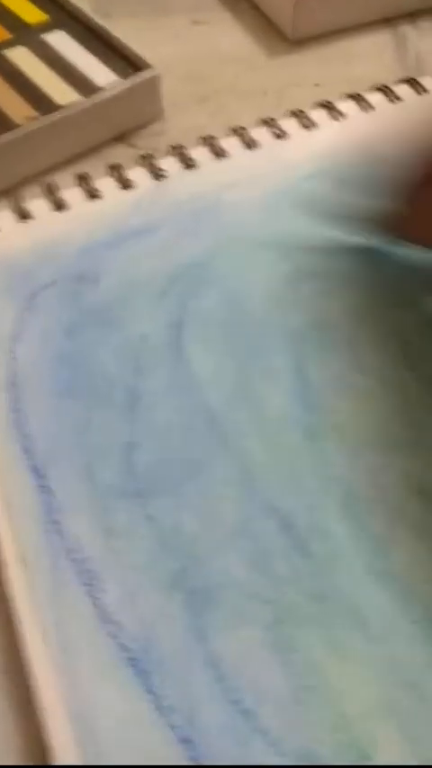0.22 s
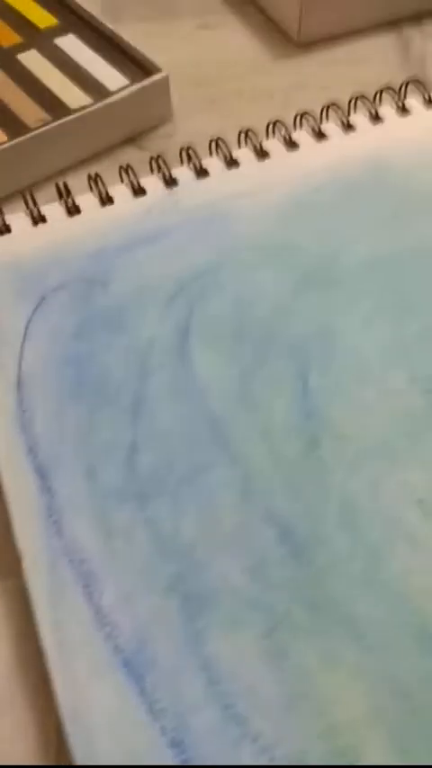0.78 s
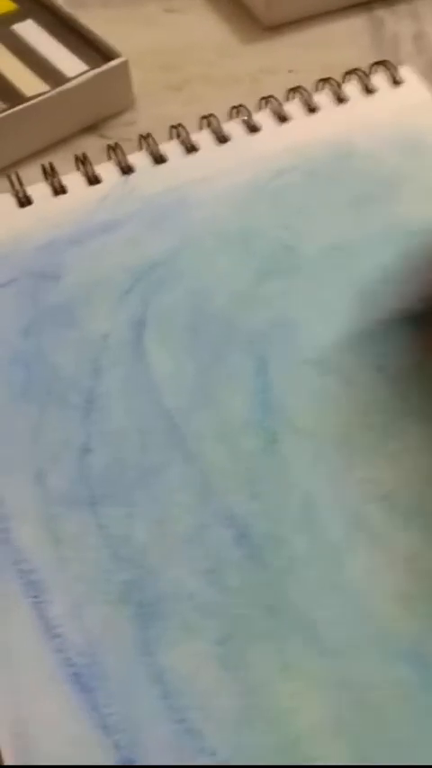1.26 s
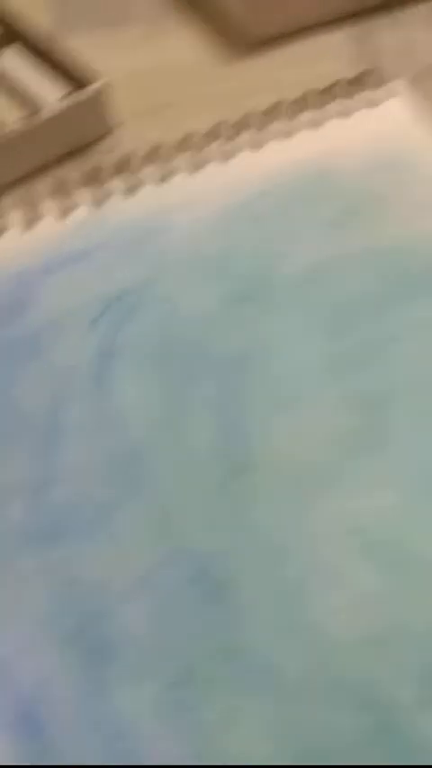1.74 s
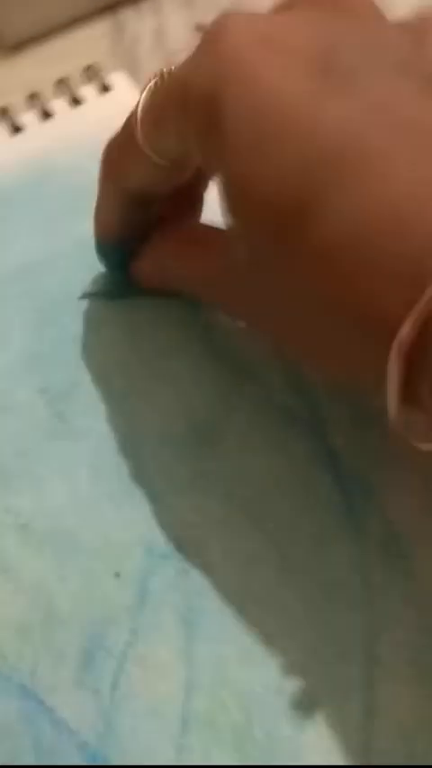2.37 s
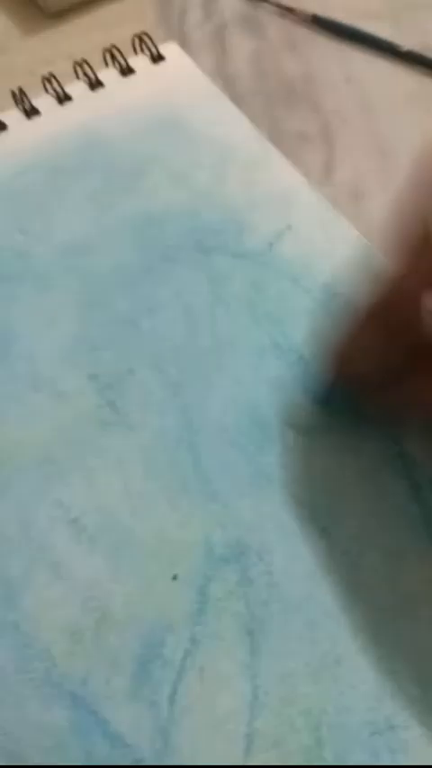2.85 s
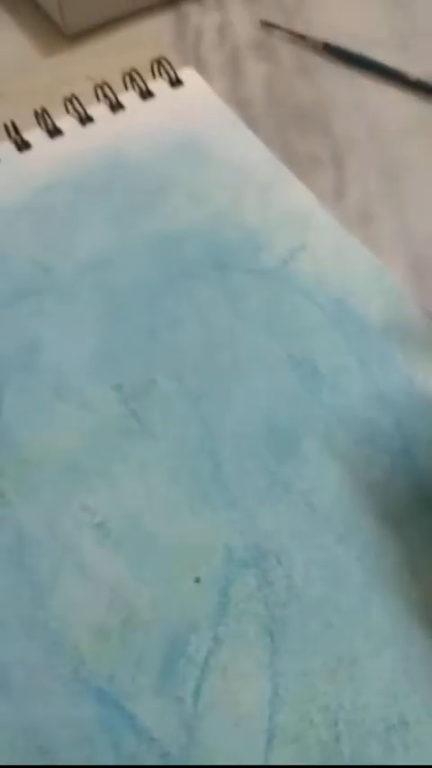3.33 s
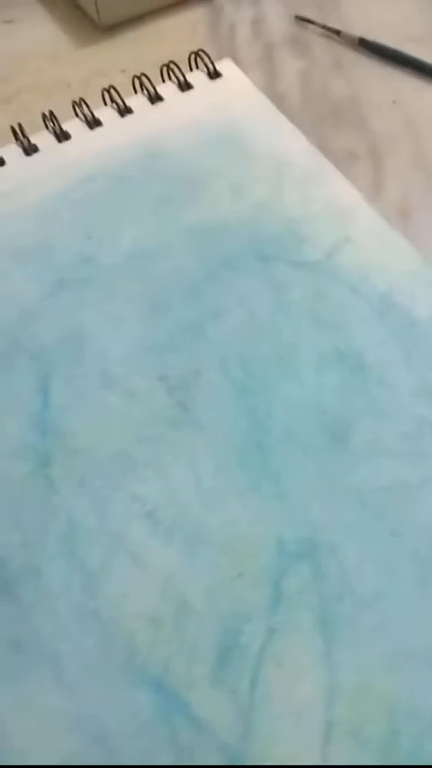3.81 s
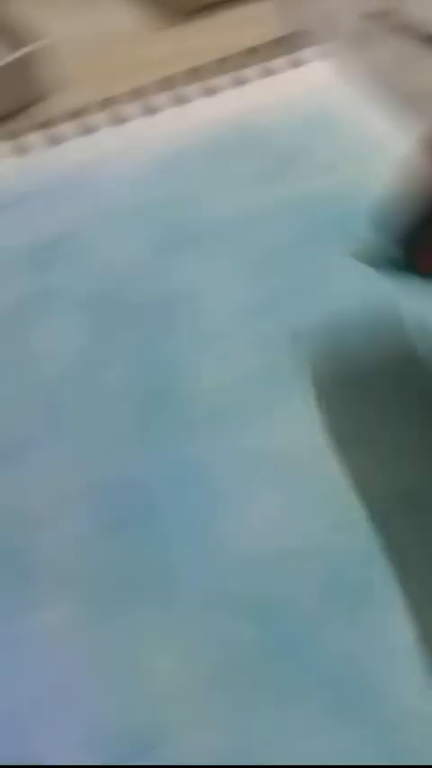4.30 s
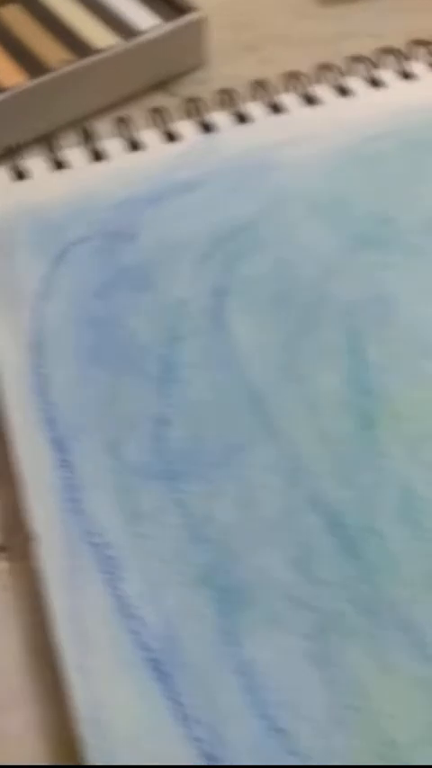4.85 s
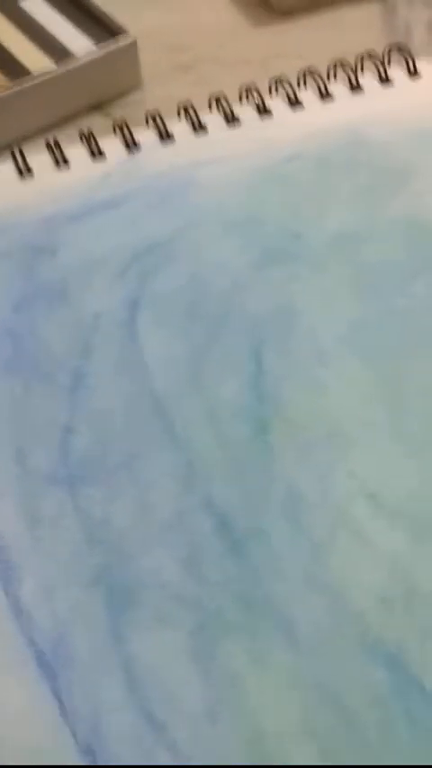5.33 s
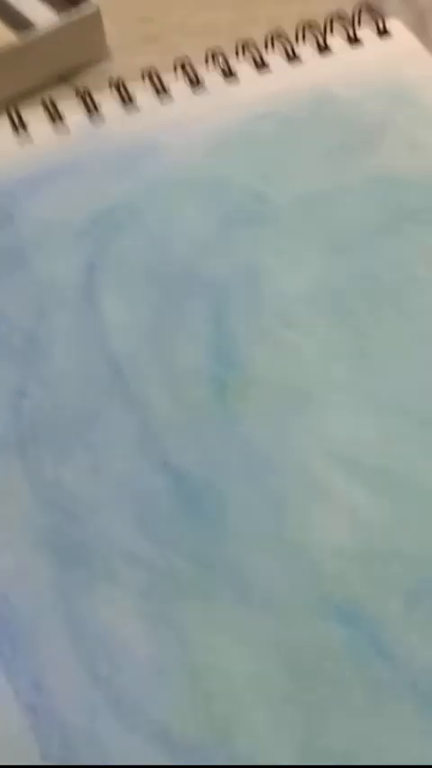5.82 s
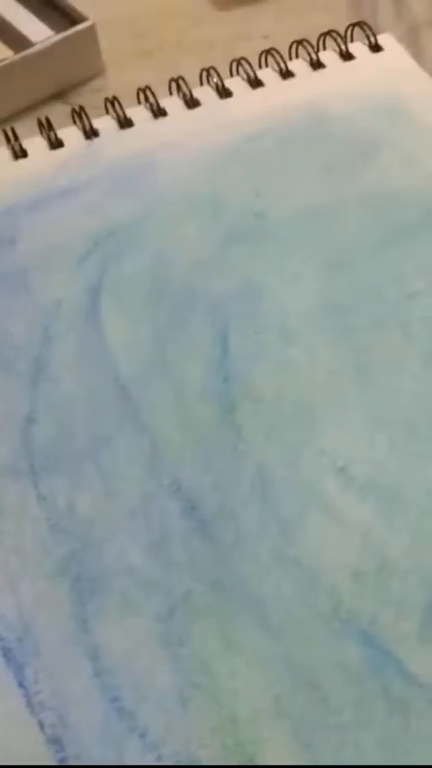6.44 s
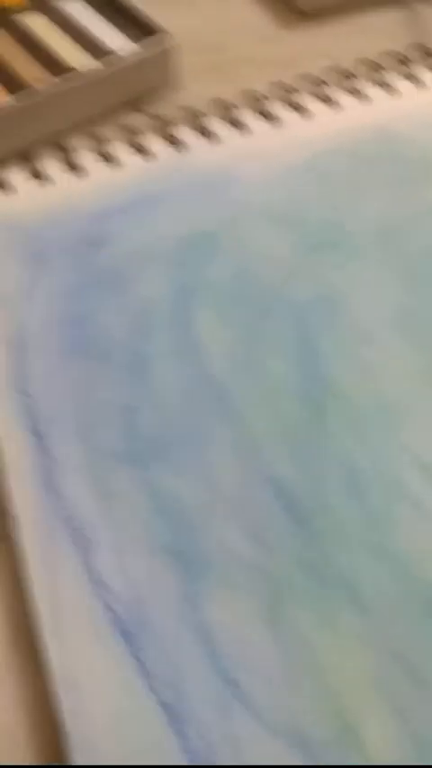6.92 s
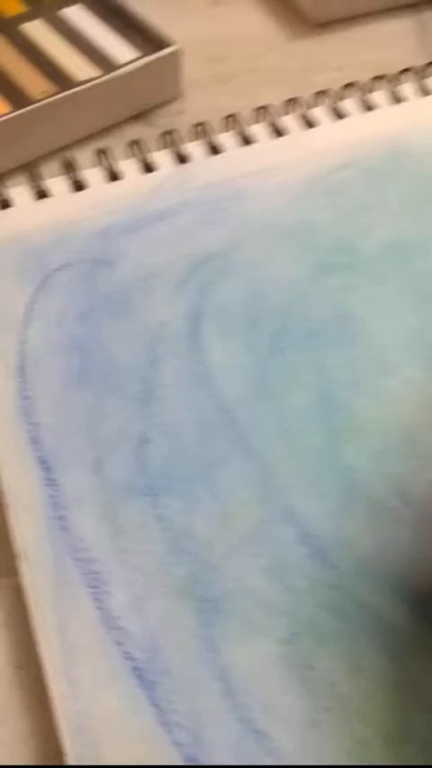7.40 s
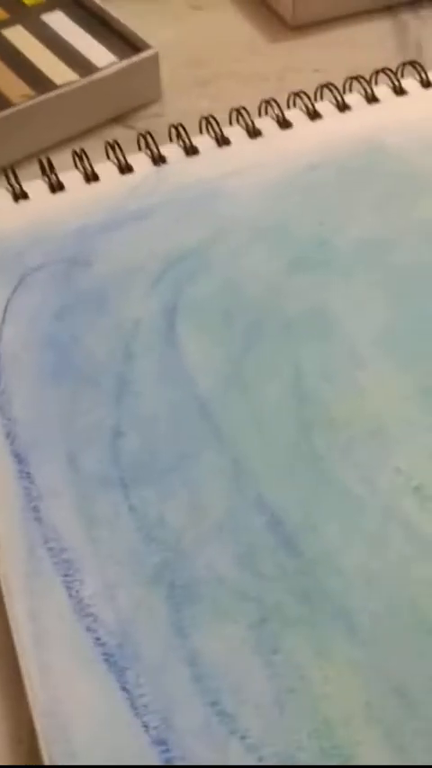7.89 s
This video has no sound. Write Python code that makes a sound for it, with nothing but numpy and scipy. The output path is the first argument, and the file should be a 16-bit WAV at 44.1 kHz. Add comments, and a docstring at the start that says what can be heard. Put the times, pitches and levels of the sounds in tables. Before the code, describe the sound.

A close stereo microphone catches chalky strokes on textured sketchbook paper: bright airy hiss over a drier papery rasp, rapid and uneven, stopping and restarting about every second. After an early pause the rubbing resumes, with small clicks and muted thumps in the gaps. The indoor background is very quiet: dull rush, low hum and a muffled far drone rising in the second half.

```python
"""A stick of dry pastel is rubbed to and fro on a sketchbook page, in short bursts of strokes, in a small room.
The chalk catches on the tooth of the paper in thousands of tiny slips, made of random clicks:
filtered one way they are a bright hiss, filtered another way the duller rasp of the sheet.
Soft bumps (damped ringing), crumb ticks (tiny noise bursts) and a faint squeak (a sinking tone) join in.
Behind are air hiss and a dull rush (noise), a low machine hum and a far, swelling drone (noise and tones)."""
import sys
import numpy as np
from scipy import signal
from scipy.fft import rfft, irfft, next_fast_len
from scipy.io import wavfile

SR = 44100
rng = np.random.default_rng(int(sys.argv[2]) if len(sys.argv) > 2 else 0)


def materialize(psi):
    """Save the field psi as 16-bit PCM at rate SR to the path in sys.argv[1].

    A 1-D psi becomes a single channel; in a 2-D psi each row is a channel.
    """
    bounded = np.clip(np.atleast_2d(psi).T, -1, 1)
    quanta = np.round(bounded * 32767).astype(np.int16)
    wavfile.write(sys.argv[1], SR, quanta)


N = 359415

# single strokes, to or fro: (start [s], length [s], chalk hiss before trim [dB], sheet rasp before trim [dB],
# hiss left minus right [dB], spread of the flexing sheet before its shares [dB], ring of the pad [dB])
STROKES = [(-0.036, 0.053, -27.5, -38, 7, 3, -3), (0.024, 0.1, -29.5, -42, 3.5, 8, -1),
           (0.351, 0.14, -30, -37, 2.5, 3, 2), (0.451, 0.09, -30.5, -36.5, 4, 5, -7),
           (0.536, 0.098, -25.5, -36.5, 2.5, 2, 2.5), (0.638, 0.099, -29.0, -37.5, 4.5, 7, -5),
           (0.729, 0.086, -25.5, -38, 3, 23, 3.5), (0.789, 0.093, -33.0, -41, 4.5, -6, 2),
           (1.113, 0.15, -27.5, -38.5, 3.5, 6, 3), (1.261, 0.087, -28.0, -38, 4.5, 6, -2),
           (1.344, 0.11, -24.5, -37, 2, 5, 2.5), (1.451, 0.14, -27, -39, 4.5, 0, 5),
           (1.567, 0.097, -25, -36, 7.5, -3, 0.5), (2.392, 0.08, -49.5, -60, 6, -3, 6),
           (2.497, 0.12, -35.5, -39.5, 0, 14, 2.5), (2.581, 0.21, -29.5, -37.5, 1.5, 17, -1.5),
           (2.776, 0.086, -25.5, -33, 3.5, 14.5, 2), (2.848, 0.11, -30.5, -42.0, 7, 11, -1),
           (2.921, 0.11, -26, -37.5, 8.0, -11, 1), (3.007, 0.11, -32, -43, 7.5, -3, 2),
           (3.099, 0.094, -28, -41, 9.5, -18, 2), (3.225, 0.019, -44, -51.5, 6.5, -11, 13),
           (3.53, 0.075, -26.0, -39.5, 7, 20, 2), (3.597, 0.15, -26, -47.5, 4, 10, 2),
           (3.689, 0.11, -24.5, -39, 9.5, -0.5, -4), (3.78, 0.13, -26.5, -46, 8, -6, -3),
           (3.88, 0.079, -24, -36, 9.5, -1, -6.5), (4.451, 0.11, -39.5, -44, 3, 5, -0.5),
           (4.516, 0.16, -26, -38.5, 1.5, 13, -0.5), (4.642, 0.092, -30, -43.5, 4.0, 5, 3.5),
           (4.708, 0.18, -27.5, -38.5, 6, -2, 2.5), (4.834, 0.19, -28.5, -40.5, 7.5, -3.5, 2.5),
           (5.269, 0.16, -27, -42, 8, -4, 6.5), (5.376, 0.11, -25.5, -38, 10, 4, -2.5),
           (5.476, 0.12, -28, -39, 5, -1.0, -3.5), (5.557, 0.096, -39.5, -49, 3, -9, 1.0),
           (5.852, 0.13, -25.0, -37, 8.5, 3, 3.5), (5.964, 0.08, -26.5, -39, 6, 0, -2.5),
           (6.054, 0.097, -27.5, -38, 5.5, -4.5, -0.0), (6.138, 0.099, -31, -41.5, 4, -10, 0),
           (6.456, 0.05, -47, -56.5, 11.5, -6, 8), (6.483, 0.19, -26, -39, 7.0, -3, -11),
           (6.655, 0.12, -32.5, -42, 7, -3, -2.5), (7.165, 0.054, -42, -49, 4, 4, 9),
           (7.209, 0.23, -27.5, -41.5, 3.5, 2.5, -2.0), (7.399, 0.22, -28.0, -41.0, 9, -4, 3.5),
           (7.572, 0.13, -30.5, -43.5, 5.5, -6, 2), (7.659, 0.13, -26.5, -40, 9.5, -3, 1),
           (7.736, 0.15, -31, -39.5, 7, -9.5, -7), (8.109, 0.14, -28.5, -41.5, 12, 0, 4)]
# bursts of strokes; the first is already under way at 0 s, the others begin as the stick lands:
# (time [s], bite [dB], brightness of the very top [dB], dull scuff [dB])
BURSTS = [(0.0, -40, -2, 2.5), (0.364, -62, 0.5, -6), (1.131, -41, -1, -5), (2.495, -54, 0, -7.5),
          (3.544, -27, -2.5, 0), (4.47, -61, -2, -3), (5.293, -44, -2, -1), (5.869, -54, -1, -1.5),
          (6.502, -33, -1, 1), (7.173, -58, -1, -2.5), (8.119, -59, -4.5, 3)]
# how alike left and right are in the background: (frequency [Hz], likeness [-1 to 1])
AIR_LIKENESS = [(100, 0.96), (280, 0.92), (600, 0.027), (1500, 0.051), (6500, 0.13), (7300, 1),
                (15000, 0.93)]


def pastel():
    """A faster stroke is louder and crosses more grains; hand pressure flutters both parts together."""
    # colour of the chalk hiss: (frequency [Hz], relative density [dB])
    hiss_colour = [(2650, -43.5), (4500, -17.5), (6000, -9.5), (8550, -3), (9870, -1.1), (12000, -5),
                   (13600, -9.5), (15600, -13)]
    # colour of the sheet's rasp: (frequency [Hz], relative density [dB])
    rasp_colour = [(60, -64), (300, -19), (600, -22), (850, -10), (1120, -5), (1400, -10.5), (1750, -8),
                   (2200, -5.5), (2700, -2), (3300, 0), (4000, 1), (5000, -1.5), (6000, 2), (8000, -15.5)]
    # how alike the friction is on the two sides: (frequency [Hz], likeness [-1 to 1])
    likeness = [(500, .3), (1050, .4), (1500, -.1), (2000, -.05), (2550, -.65), (3300, 0), (4300, -.15),
                (4800, .3), (5600, -.1), (6600, -.05), (7100, .78), (8500, .94), (12000, .9), (15500, .72)]
    # which side the friction leans to: (frequency [Hz], left minus right [dB])
    lean = [(700, -3.5), (1500, 1), (2500, -1), (3400, -5), (4200, -3), (5800, -1.5), (9000, -3.5),
            (12000, -4), (13500, -6.5), (15500, -12)]

    hiss_gain, rasp_gain = stroke_gains()
    hiss_gain = hiss_gain + bite(fade_s=0.0057)
    edge_db, scuff_db = tipping()
    pan_db, spread_db, pad_db = per_stroke()
    slips_per_s = 8000 + 22000 * np.sqrt(hiss_gain / hiss_gain.max())
    hiss_slips = slips(slips_per_s, size_db=1.0, clump_db=-1.43, clump_hz=500)
    rasp_slips = slips(slips_per_s, size_db=0.0, clump_db=0.5, clump_hz=320)
    hiss = stereo(hiss_slips, hiss_colour, likeness)
    rasp = stereo(rasp_slips, rasp_colour, likeness)
    # the edge of the stick sets how bright the very top is, mostly softening it
    hiss = hiss + shaped(hiss, high_share(8800)) * (from_db(edge_db) - 1)
    # how flat the stick lies sets how much dull scuff is heard below the hiss
    rasp = rasp + shaped(rasp, 1 - high_share(3260)) * (from_db(scuff_db) - 1)
    hiss = from_db(-0.97) * hiss_gain * hiss * from_db(np.array([pan_db, -pan_db]) / 2)
    rasp = from_db(-3.0) * rasp_gain * sheet(rasp, spread_db, pad_db)
    pressure = from_db(0.32 * drift(30))
    rub = pressure * patchy(hiss + rasp, patch_db=1.85, patch_hz=13.0, sway_db=1.0)
    # reflections off the fingers and the palm
    fingers = glance(rub, lag_ms=.55, wander=.18, strength=.4)
    palm = glance(rub, lag_ms=1.4, wander=.13, strength=.38)
    return shaped(rub + fingers + palm, from_db(at_hz(lean) * [[1], [-1]] / 2))


def stroke_gains():
    """Hiss and rasp follow the speed of the hand through each stroke, and linger briefly."""
    arch_power = 0.63  # below 1 gives a flatter arch
    linger_s = .0125
    power = np.zeros((2, N))
    for start_s, length_s, hiss_db, rasp_db, *_ in STROKES:
        at, speed = arch(start_s, length_s)
        power[:, at] += np.outer(from_db([hiss_db, rasp_db]), speed ** arch_power) ** 2
    keep = np.exp(-1 / (linger_s * SR))
    return np.sqrt(signal.lfilter([1 - keep], [1, -keep], power + 1e-18))


def arch(start_s, length_s):
    """Half a sine, from rest to full speed and back: the samples it covers, and the speed at each."""
    first = max(int(start_s * SR), 0)
    end = min(int((start_s + length_s) * SR), N)
    at = np.arange(first, end)
    return at, np.maximum(np.sin(np.pi * (at / SR - start_s) / length_s), 0)


def bite(fade_s):
    """The stick bites into the paper at each time in the table: abrupt friction that fades at once."""
    kicks = np.zeros(N)
    for time_s, db, *_ in BURSTS:
        kicks[max(int(time_s * SR), 0)] = from_db(db)
    return signal.lfilter([1], [1, -np.exp(-1 / (fade_s * SR))], kicks + 1e-18)


def tipping():
    """Edge and scuff in dB: within each burst the top softens and the scuff grows as the stick tips flat."""
    edge_db_per_s, scuff_db_per_s, longest_tip_s = -4.5, 3, 1
    burst_s, _, edge_db, scuff_db = np.transpose(BURSTS)
    t = np.arange(N) / SR
    burst = np.maximum(np.searchsorted(burst_s, t) - 1, 0)
    age = np.minimum(t - burst_s[burst], longest_tip_s)
    return edge_db[burst] + edge_db_per_s * age, scuff_db[burst] + scuff_db_per_s * age


def per_stroke():
    """Pan, spread and pad level, gliding from the middle of one stroke to the next."""
    return in_time([(start_s + length_s / 2, *rest) for start_s, length_s, _, _, *rest in STROKES])


def slips(per_s, size_db, clump_db, clump_hz):
    """Two trains of tiny, uneven slips, clumped by the ridges of the paper, plus coarse grains that snag."""
    snags_per_s, largest_snag_db = 170, 15
    chance = np.clip(per_s / SR, 1e-3, 1)
    born = rng.random((2, N)) < chance
    extra_db = size_db * np.minimum(rng.exponential(1, (2, N)), 3)
    sizes = from_db(extra_db) * rng.standard_normal((2, N))
    snagged = rng.random((2, N)) < snags_per_s / SR
    snag_sizes = from_db(largest_snag_db) * rng.uniform(0.26, 1, (2, N))
    snags = snagged * snag_sizes * rng.choice([-1, 1], (2, N))
    clumps = from_db(clump_db * np.clip(drift(clump_hz), -2, 2))
    # dividing by the root of the chance keeps the power even when slips are rare
    return born * sizes / np.sqrt(chance) * clumps + snags


def sheet(rasp, spread_db, pad_db):
    """The touched spot sets how the sheet rocks, in opposite phase at the sides; the pad rings below."""
    flex_low_hz, flex_high_hz = 1490, 3520
    hollow_share, widen_share = 0.46, 0.28  # a positive spread thins the centre and lifts the sides
    mid, side = (rasp[0] + rasp[1]) / 2, (rasp[0] - rasp[1]) / 2
    flex = high_share(flex_low_hz) * (1 - high_share(flex_high_hz))
    mid = mid + shaped(mid, flex) * (from_db(-hollow_share * spread_db) - 1)
    side = side + shaped(side, flex) * (from_db(widen_share * spread_db) - 1)
    rasp = np.array([mid + side, mid - side])
    return rasp + shaped(rasp, 1 - high_share(flex_low_hz)) * (from_db(pad_db) - 1)


def patchy(x, patch_db, patch_hz, sway_db):
    """Each part of the spectrum swells and sinks a little on its own, and sways between left and right."""
    centres = np.geomspace(900, 15000, num=11)  # Hz
    spectrum, hz, out = rfft(x, fft_size()), bin_hz(), 0
    for k in range(len(centres)):
        share = np.interp(hz, centres, np.arange(len(centres)) == k)
        level_db = patch_db * drift(patch_hz) + np.outer([1, -1], sway_db * drift(patch_hz / 2))
        out = out + irfft(spectrum * share, fft_size())[:, :N] * from_db(level_db)
    return out


def glance(x, lag_ms, wander, strength):
    """A reflection off a nearby surface; its path changes as the hand moves, and sweeps a shallow comb."""
    n = np.arange(N)
    lag = SR * lag_ms / 1000 * (1 + wander * drift(2))  # samples
    return strength * np.array([np.interp(n - lag, n, side) for side in x])


def bumps():
    """Each soft handling bump rings the book's damped modes, unevenly in each ear; hard ones ring higher."""
    # soft bumps on the book: (time [s], level [dB], hardness [dB per octave])
    bump_rows = [(.909, -52, -2), (.921, -53, -2), (.933, -52, -2), (1.513, -48.5, 0), (1.855, -51, 3.5),
                 (4.262, -59, 0)]
    # what the book rings with: (frequency [Hz], relative level [dB], time to fall 60 dB [s])
    modes = [(183, -5, 0.12), (383, 5.5, 0.014), (750, 2, 0.0064), (1070, -2, 0.013), (1750, -12.5, 0.017),
             (2380, -11, .01)]
    spread_db = 3
    t, out = np.arange(SR // 8) / SR, np.zeros((2, N))
    rings = []
    for k, (hz, db, t60) in enumerate(modes):
        # neighbouring modes start in opposite directions
        rings.append((-1) ** k * from_db(db - 60 * t / t60) * np.sin(2 * np.pi * hz * t))
    octaves = np.log2(np.array(modes)[:, 0] / 500)
    for time_s, db, tilt_db in bump_rows:
        at = int(time_s * SR)
        strength_db = db + tilt_db * octaves + rng.normal(0, spread_db, (2, len(modes)))
        out[:, at:at + len(t)] += from_db(strength_db) @ np.array(rings)
    # the bumps carry no deep bass
    return signal.sosfilt(signal.butter(2, 150, "high", fs=SR, output="sos"), out)


def crumbs():
    """Crumbs of pastel tick on the page: each a tiny crack, coloured by a pitch of its own."""
    # ticks: (time [s], peak level [dB], pitch [Hz])
    ticks = [(1.069, -49.5, 8140), (2.014, -47, 10050), (2.307, -47, 10840), (3.426, -44, 10400),
             (3.488, -48, 7840), (4.214, -48, 10000), (4.237, -50.5, 10700), (4.254, -52, 9780),
             (5.055, -27.5, 10000), (5.129, -46, 10400), (5.214, -53, 14200), (6.325, -43, 15000),
             (6.959, -47, 11400), (8.01, -45, 10700), (8.053, -52, 9600)]
    t60_s, q = .014, 2.5  # the crack's fall of 60 dB, and how narrowly it is tuned
    t, out = np.arange(SR // 50) / SR, np.zeros((2, N))
    for time_s, db, hz in ticks:
        crack = rng.standard_normal((2, len(t))) * from_db(-60 * t / t60_s)
        tick = signal.lfilter(*signal.iirpeak(hz, q, fs=SR), crack)
        at = int(time_s * SR)
        out[:, at:at + len(t)] += from_db(db) * tick / np.abs(tick).max()
    return out


def squeak():
    """A faint, wavering squeak that sinks in pitch, as of a fingertip on the page."""
    # one squeak: (start [s], length [s], peak level [dB], starting pitch [Hz])
    start_s, length_s, db, hz = (.94, .16, -65, 2570)
    sag_hz_per_s, slip_rad = 900, 3
    at, speed = arch(start_s, length_s)
    phase = 2 * np.pi * np.cumsum(hz - sag_hz_per_s * (at / SR - start_s)) / SR
    out = np.zeros((2, N))
    for side in out:
        side[at] = from_db(db) * speed * np.sin(phase + slip_rad * drift(60)[at])
    return out


def room(x, t60):
    """Dense reflections that die away by 60 dB in t60 s, partly shared by the two sides."""
    t = np.arange(SR // 2) / SR
    tail = rng.standard_normal((2, len(t))) * from_db(-60 * t / t60) * (t > .004)
    tail = tail + tail[::-1] / 2
    return shaped(x, rfft(tail / np.sqrt(np.sum(tail ** 2) / 2), fft_size()))


def machine_hum():
    """Wavering low tones in a bed of rumble, throbbing with each turn of the machine."""
    # steady pitches of the machine: (frequency [Hz], level around which it throbs [dB])
    hum = [(102.8, -79), (125.8, -70.5), (170.5, -65), (215, -69)]
    # colour of the rumble: (frequency [Hz], relative density [dB])
    rumble_colour = [(25, -50), (55, -28), (70, -17.5), (85, -21.5), (110, -9.5), (128, -4), (146, -10),
                     (168, -2.5), (200, 5), (235, -5), (290, -8.5), (360, -12.5), (500, -17), (800, -24.5),
                     (6000, -54)]
    turns_per_s, crest_s = 2.87, .31  # and the time of one crest of the throb
    tone_throb_db, rumble_throb_db = 4, 0.5
    throb = np.cos(2 * np.pi * turns_per_s * (np.arange(N) / SR - crest_s))
    tones = sum(from_db(db) * wavering(hz, flutter_db=4.0, slip=1.0, rate=3.13) for hz, db in hum)
    rumble = from_db(-57.5) * stereo(rng.standard_normal((2, N)), rumble_colour, AIR_LIKENESS)
    both = tones * from_db(tone_throb_db * throb) + rumble * from_db(rumble_throb_db * throb)
    return both * from_db([[-.5], [.5]])  # leans slightly right


def far_drone():
    """A muffled drone comes through the walls, swells and fades, with two tones standing out of it."""
    # loudness of the drone's body: (time [s], level [dB])
    swell = [(0, -76), (3.5, -72), (4.4, -62), (5.2, -65), (5.55, -58), (5.8, -59), (5.95, -53), (6.1, -53),
             (6.3, -48.5), (6.45, -52), (6.75, -60), (8.15, -64)]
    # its resonances: (frequency [Hz], width [Hz], relative level [dB])
    resonances = [(62, 35, -29), (168, 18, 1), (190, 14, -4), (213, 9, -1), (256, 14, -8), (284, 26, -5),
                  (320, 34, -7), (385, 50, -10), (440, 20, -15), (562, 40, -14)]
    # its lower tone, before trim: (time [s], level [dB])
    lower_level = [(0.1, -83), (4.08, -66.5), (4.26, -54), (4.95, -58), (5.3, -60), (6.7, -71), (8.05, -63)]
    # its upper tone, before trim: (time [s], level [dB])
    upper_level = [(0.0, -79), (2.72, -84), (4.65, -65), (5.58, -70), (5.76, -53.5), (6.13, -60),
                   (6.17, -45), (6.31, -42.5), (6.54, -57.5), (7.17, -64.5), (8.15, -63.5)]
    lower_hz, upper_hz = 253.6, 281
    centre = resonant_noise(resonances)
    sides = from_db(-12.5) * resonant_noise(resonances) * [[1], [-1]]
    body = from_db(in_time(swell)[0]) * (centre + sides)
    low = from_db(in_time(lower_level)[0] - 4.0) * wavering(lower_hz, flutter_db=0.0, slip=1.66, rate=6.9)
    high = wavering(upper_hz, flutter_db=1.0, slip=0.42, rate=10)
    octave = from_db(-30) * wavering(2 * upper_hz, flutter_db=1.5, slip=0.9, rate=9)
    high = from_db(in_time(upper_level)[0] - 0.9) * (high + octave)
    return (body + low + high) * from_db([[.6], [-.6]])  # leans slightly left


def wash():
    """A dull, diffuse rush in the background that comes and goes: filtered noise."""
    # loudness of the rush: (time [s], level [dB])
    wash_level = [(.28, -80), (1.0, -71.5), (1.9, -74), (2.33, -87), (3.45, -77), (4.3, -69.5), (5.2, -71),
                  (5.8, -65), (6.4, -66.5), (7.05, -70), (8.1, -67.5)]
    # its colour: (frequency [Hz], relative density [dB])
    wash_colour = [(200, -18), (500, 2), (900, -4), (1500, -11), (2500, -13.5), (5000, -35)]
    noise = stereo(rng.standard_normal((2, N)), wash_colour, AIR_LIKENESS)
    return from_db(in_time(wash_level)[0]) * noise


def air():
    """Faint air hiss of the room, slightly restless: filtered noise."""
    # loudness around which the hiss wanders: (time [s], level [dB])
    air_level = [(0, -44), (.2, -59), (.32, -64.5), (1.0, -57.5), (1.9, -58.5), (2.2, -58), (2.36, -65),
                 (3.3, -58.5), (3.5, -61.5), (4.05, -57.5), (4.4, -59.5), (5.2, -61), (5.7, -56.5),
                 (5.82, -61.5), (6.33, -59.5), (6.44, -64.5), (6.88, -59.5), (7.0, -65), (7.15, -66),
                 (7.97, -56.5), (8.09, -63.5)]
    # its colour: (frequency [Hz], relative density [dB])
    air_colour = [(500, -12), (1000, -3), (2000, -1), (3500, -3), (5500, 2), (7500, 4.5), (10000, 9),
                  (13000, 3.5), (16000, 5)]
    level_db = in_time(air_level)[0] + 1.2 * drift(11)
    return from_db(level_db) * stereo(rng.standard_normal((2, N)), air_colour, AIR_LIKENESS)


def stereo(pair, spectrum, likeness):
    """Two unrelated signals become a coloured left and right of given likeness; rms 1."""
    alike, gain = np.clip(at_hz(likeness), -1, 1), from_db(at_hz(spectrum))
    mid, side = shaped(pair, gain * np.sqrt([1 + alike, 1 - alike]))
    return rms_one(np.array([mid + side, mid - side]))


def resonant_noise(modes):
    """Noise held in narrow resonances with steep skirts; rms 1."""
    gain = 0
    for hz, width, db in modes:
        gain = gain + from_db(db) / np.sqrt(width) / (1 + ((bin_hz() - hz) / width * 2) ** 2)
    return rms_one(shaped(rng.standard_normal(N), gain))


def wavering(hz, flutter_db, slip, rate):
    """A tone whose level and phase (slip, in radians) wander; rms near 1."""
    level = np.sqrt(2) * from_db(flutter_db * drift(rate))
    return level * np.sin(2 * np.pi * hz * np.arange(N) / SR + slip * drift(rate))


def drift(rate):
    """Slow chance with a spread of 1, drawn at every 16th sample; a higher rate (Hz) wanders faster."""
    r = np.exp(-2 * np.pi * rate * 16 / SR)
    draws = rng.standard_normal(N // 16 + 3002)
    slow = signal.lfilter([1], [1, -2 * r, r * r], draws)[3000:]  # skip the filter's start
    return np.interp(np.arange(N) / 16, np.arange(len(slow)), rms_one(slow))


def from_db(db):
    """Decibels to gain."""
    return np.exp(np.asarray(db) * (np.log(10) / 20))


def rms_one(x):
    """Scale to unit rms."""
    return x / np.sqrt(np.mean(x ** 2) + 1e-20)


def in_time(rows):
    """Each column of a curve at every sample; the first column is time in s."""
    s, *columns = np.transpose(rows)
    return [np.interp(np.arange(N) / SR, s, c) for c in columns]


def fft_size():
    """A transform length with room for tails."""
    return next_fast_len(N + SR // 2, True)


def bin_hz():
    """Frequency of every transform bin, at least 1 Hz."""
    return np.maximum(np.arange(fft_size() // 2 + 1) * SR / fft_size(), 1)


def at_hz(points):
    """A table over log frequency, read at every bin."""
    hz, value = np.transpose(points)
    return np.interp(np.log(bin_hz()), np.log(hz), value)


def shaped(x, gain):
    """Filter by a gain per bin."""
    return irfft(rfft(x, fft_size()) * gain, fft_size())[..., :N]


def high_share(hz):
    """Share of each bin that lies above a crossover."""
    return 1 / (1 + (hz / bin_hz()) ** 8)


def scene():
    """The page close by, early reflections off the table, the dull tail of the room, and the background."""
    page = pastel() + bumps() + crumbs() + squeak()
    early = from_db(-12.5) * room(page, t60=.09)
    late = from_db(-14) * shaped(room(page, t60=0.71), 1 - high_share(2700))
    return page + early + late + machine_hum() + far_drone() + wash() + air()


def record(dry):
    """The top is cut steeply."""
    cutoff_hz = 15950
    return shaped(dry, np.clip((cutoff_hz - bin_hz()) / 200 + .5, 0, 1))


dry = scene()
out = record(dry)
materialize(out)
```